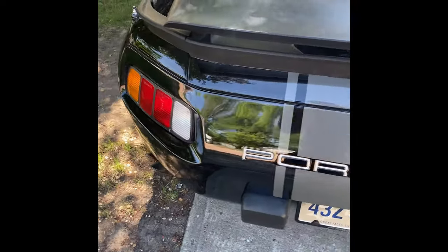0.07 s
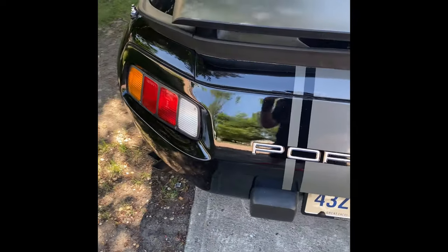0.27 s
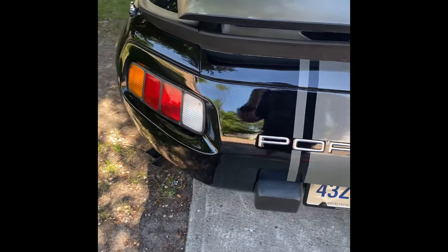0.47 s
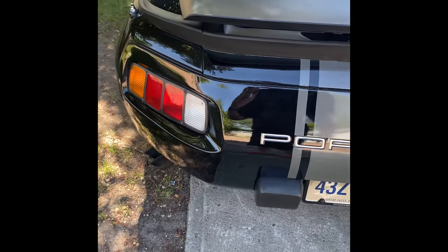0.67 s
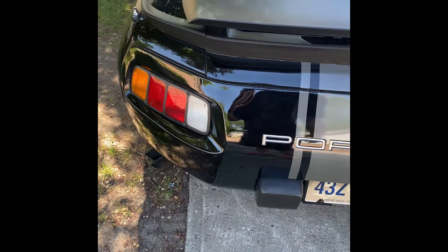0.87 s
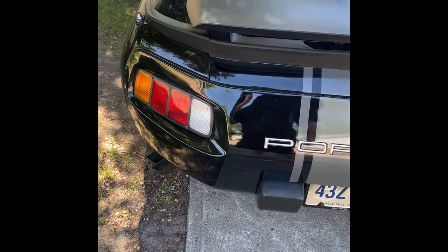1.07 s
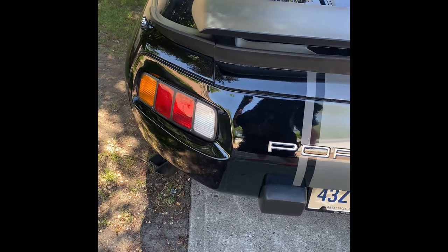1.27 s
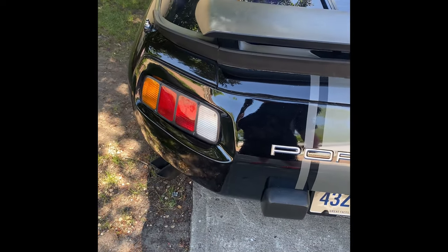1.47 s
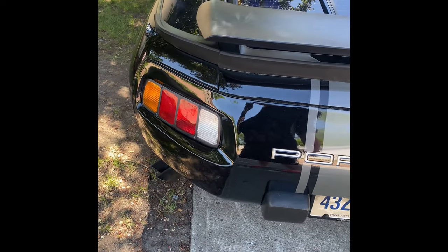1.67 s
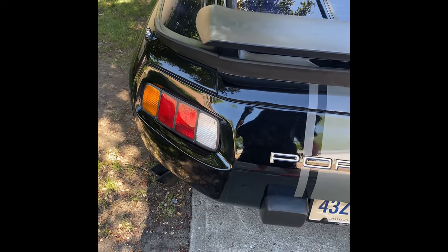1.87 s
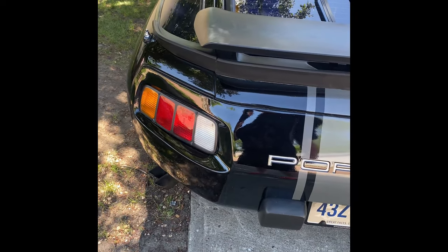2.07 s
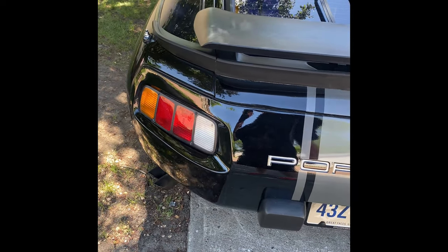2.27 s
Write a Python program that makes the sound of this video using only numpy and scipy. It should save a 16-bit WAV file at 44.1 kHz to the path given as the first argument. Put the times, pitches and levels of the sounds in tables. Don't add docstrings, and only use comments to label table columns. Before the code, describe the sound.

A large petrol engine idles steadily with a deep, even exhaust boom, heard close behind the tailpipe.

```python
import sys
import numpy as np
from scipy import signal
from scipy.fft import rfft, irfft
from scipy.io import wavfile
from scipy.ndimage import uniform_filter1d

SR = 44100
rng = np.random.default_rng(int(sys.argv[2]) if len(sys.argv) > 2 else 0)


def amplitude_ratio(level_db):
    exponent = np.asarray(level_db, float) / 20
    return 10 ** exponent


def output_pcm(signal):
    pcm = np.clip(np.atleast_2d(signal).T, -1, 1) * 32767
    wavfile.write(sys.argv[1], SR, np.round(pcm).astype(np.int16))


N = 102664
FIRINGS_PER_CYCLE = 8
TIP_LAG_CYCLES = .8


def level(x, db):
    return x * amplitude_ratio(db) / np.sqrt(np.mean(x ** 2))


def ring(x, hz, width_hz):
    pole = np.exp((2j * np.pi * hz - np.pi * width_hz) / SR)
    return level(signal.lfilter([1], np.poly([pole, pole]), x).imag, 0)


def walk(rate_hz):
    draw = np.interp(np.arange(N) * rate_hz / SR, np.arange(200), rng.standard_normal(200))
    return level(uniform_filter1d(draw, int(SR / rate_hz / 2)), 0)


def along(table, column):
    hz = np.fft.rfftfreq(N, 1 / SR) + 1
    return np.interp(np.log(hz), np.log(np.array(table)[:, 0]), np.array(table)[:, column])


def boom(cycle, orders, lag_cycles):
    wobble_db, wobble_rad, wobble_hz = .7, .007, 9
    out = 0
    for order, db in orders:
        gain = amplitude_ratio(db + wobble_db * walk(wobble_hz))
        phase = 2 * np.pi * (cycle - lag_cycles) + wobble_rad * walk(wobble_hz)
        out = out - gain * np.cos(order * phase)
    return out


def tip(cycle):
    tip_hz, swell_s, scatter_db, slip_rad = 395.5, .14, 1.5, .8
    # time [s], rms level [dB].
    drive = [(0, -30.5), (0.249, -36), (0.601, -40.5), (0.951, -31), (1.298, -37), (1.6, -29), (1.9, -33),
             (2.33, -31)]
    peak = np.flatnonzero(np.diff(np.floor(cycle - TIP_LAG_CYCLES)))
    strength, slip = rng.standard_normal((len(peak), 2)).T
    kick = np.zeros(N, complex)
    kick[peak] = amplitude_ratio(scatter_db * strength) * np.exp(1j * slip_rad * slip)
    half = int(swell_s * SR / 2)
    t = np.arange(-half, half + 1) / SR
    swell = np.hanning(2 * half + 1) * np.exp(2j * np.pi * tip_hz * t)
    tone = signal.fftconvolve(kick, swell, mode="same").real
    drive_db = np.interp(np.arange(N) / SR, *np.array(drive).T)
    return amplitude_ratio(drive_db) * level(tone, 0)


def uneven(cycle):
    # centre [Hz], width [Hz], rms level [dB].
    cavities = [(48, 13, -39), (82, 12, -36), (98, 14, -40), (114, 10, -39), (134, 9, -48), (152, 12, -50),
                (170, 18, -55), (195, 18, -51), (226, 15, -45), (250, 18, -47), (270, 15, -42),
                (292, 22, -47), (322, 20, -49), (348, 24, -52)]
    fired = np.flatnonzero(np.diff(np.floor(cycle * FIRINGS_PER_CYCLE)))
    out = 0
    for hz, width_hz, db in cavities:
        kick = np.zeros(N)
        kick[fired] = rng.standard_normal(len(fired))
        out = out + amplitude_ratio(db) * ring(kick, hz, width_hz)
    return out


def gas(cycle):
    firing_db, cycle_db, scatter_db = -1, 1, 4
    # centre [Hz], width [Hz], rms level [dB].
    whistles = [(409.2, 29, -41), (455, 46, -59), (529.2, 17, -52), (648, 57, -60), (698, 71, -48),
                (794, 100, -60.5), (1072, 220, -67.5), (1417, 65, -56), (1897, 120, -59.5)]
    firing = cycle * FIRINGS_PER_CYCLE
    puff_db = firing_db * np.cos(2 * np.pi * firing)
    puff_db = puff_db + cycle_db * np.cos(2 * np.pi * (cycle - TIP_LAG_CYCLES))
    puff_db = puff_db + scatter_db * np.interp(firing, np.arange(200), rng.standard_normal(200))
    out = 0
    for hz, width_hz, db in whistles:
        out = out + amplitude_ratio(db) * ring(amplitude_ratio(puff_db) * rng.standard_normal(N), hz, width_hz)
    return out


def hiss():
    hiss_db, patch_db, flicker_db = -39.5, .5, 1.5
    # frequency [Hz], density [dB per Hz].
    side_hiss = [(300, -8), (700, 0), (1900, -15), (2600, -10), (5600, -20), (7600, -15), (13150, -16),
                 (13250, -27)]
    # frequency [Hz], level [dB].
    mid_over_side = [(700, -6.5), (2000, -1.5), (3800, -7.5), (6500, -2), (7800, -3), (12000, -7.5),
                     (13100, -3), (14000, 2.5)]
    third = 3 * np.log2(np.fft.rfftfreq(N, 1 / SR) + 1)
    pair = rfft(rng.standard_normal((2, N))) * amplitude_ratio(along(side_hiss, column=1))
    pair[0] *= amplitude_ratio(along(mid_over_side, column=1))
    mid, side = np.zeros((2, N))
    for centre in range(22, 43):
        band = irfft(pair * np.clip(1 - abs(third - centre), 0, 1), N)
        mid += amplitude_ratio(flicker_db * walk(24.96) + patch_db * walk(7.955)) * band[0]
        side += amplitude_ratio(flicker_db * walk(20)) * band[1]
    return level(np.array([mid + side, mid - side]), hiss_db)


def scuffs():
    cracks_per_s, spread_db = 5000, 1.2
    # start [s], length [s], rms level [dB], treble [dB per octave],
    # swell exponent, lead of the left [samples].
    slides = [
        (0.188, 0.059, -28.5, 7.5, .4, 3),
        (0.641, 0.16, -40, -18, 0.72, 1),
    ]
    # centre [Hz], width [Hz], level [dB].
    grit = [(2120, 920, -12.5), (2610, 1030, 3.5), (3150, 1260, -2.5), (4200, 530, -3.5), (6550, 1200, -2),
            (8400, 1800, -9.5)]
    out, t = np.zeros((2, N)), np.arange(N) / SR
    for start_s, length_s, db, treble_db, swell, lead in slides:
        u = np.clip((t - start_s) / length_s, 0, 1)
        envelope = np.sin(np.pi * u ** swell) ** 1.7
        struck = rng.random(N) < cracks_per_s / SR
        cracks = struck * amplitude_ratio(spread_db * rng.exponential(size=N)) * rng.standard_normal(N)
        for ear in range(2):
            rub = .6 * level(rng.standard_normal(N), 0) * cracks.std()
            tone = 0
            for hz, width_hz, grit_db in grit:
                gain = amplitude_ratio(grit_db + treble_db * np.log2(hz / 2700))
                tone = tone + gain * ring(cracks + rub, hz, width_hz)
            out[ear] += np.roll(level(tone, db) * envelope, lead * ear)
    return out


def scene():
    # time [s], speed [rpm].
    speed = [(0.0, 993.8), (0.33, 983.3), (0.67, 992.5), (1.0, 989.8), (1.33, 988.8), (1.66, 1000.6),
             (2.0, 992.2), (2.33, 999.8)]
    # multiple of the cycle rate, peak level [dB].
    silencer = [(6, -38), (8, -14), (10, -20), (12, -32), (14, -32), (16, -41)]
    # multiple of the cycle rate, peak level [dB].
    banks = [(7, -42), (9, -33), (11, -34), (13, -33)]
    # multiple of the cycle rate, peak level [dB].
    pipe = [(22, -48), (24, -44), (25, -44), (27, -33), (29, -41), (31, -42), (33, -30), (34, -49),
            (38, -41)]
    # frequency [Hz], lead of the left [rad], left over right [dB].
    ports = [(50, 0, .1), (110, -.1, .2), (270, -.33, .4), (400, -1.2, .5), (520, -2.1, -1),
             (700, -2.4, -5), (1300, -1.8, -7.5), (2400, -1., 0)]
    rpm = np.interp(np.arange(N) / SR, *np.array(speed).T)
    cycle = .0455 + np.cumsum(rpm) / 120 / SR
    exhaust = boom(cycle, silencer, lag_cycles=.066)
    exhaust = exhaust + boom(cycle, banks, lag_cycles=.722) + boom(cycle, pipe, lag_cycles=.93)
    exhaust = exhaust + tip(cycle) + uneven(cycle) + gas(cycle)

    ear = np.array([[.5], [-.5]])
    lead_rad = along(ports, column=1) * ear
    tilt = amplitude_ratio(along(ports, column=2) * ear)
    margin = SR // 4
    padded = N + SR // 2

    def spread(rows):
        grid = np.linspace(0, 1, padded // 2 + 1)
        return np.array([np.interp(grid, np.linspace(0, 1, len(row)), row) for row in rows])

    lead = spread(lead_rad)
    turn = spread(tilt) * np.exp(1j * lead) / np.cos(np.clip(lead, -.7, .7))
    wide = irfft(rfft(np.pad(exhaust, margin, mode="reflect")) * turn, padded)[:, margin:margin + N]
    return wide + irfft(rfft(hiss()) * tilt, N) + scuffs()


def roll_off(x):
    return signal.sosfilt(signal.butter(12, 16900, fs=SR, output="sos"), x)


def record(dry):
    top_hz, spare_loud = 15700, 3
    # from [Hz], to [Hz], share of time lost by the sum,
    # share lost by the difference.
    dropouts = [(2900, 4100, .3, 0), (4700, 5400, .3, 0), (7900, 8300, .6, 0), (8300, 11300, 1, 0),
                (11300, 12300, .75, 0), (13250, 14600, .8, .4), (14600, 15800, .25, .55)]
    hz, t, z = signal.stft(np.array([dry[0] + dry[1], dry[0] - dry[1]]) / 2, SR, nperseg=2048)
    luck = uniform_filter1d(rng.standard_normal((2, 80, len(t))), size=3)
    luck = luck[:, (hz / 345).astype(int)]
    loud = np.log(uniform_filter1d(abs(z) ** 2, size=32, axis=1) + 1e-18)
    excess = loud - np.median(loud, axis=2, keepdims=True) - 1
    luck = luck + spare_loud * np.clip(excess, 0, 9)
    rank = np.argsort(np.argsort(luck)) / len(t)
    lost = 0
    for low_hz, high_hz, *share in dropouts:
        inside = ((hz >= low_hz) & (hz < high_hz))[:, None]
        lost = lost + inside * (rank < np.array(share)[:, None, None])
    mid, side = signal.istft(z * (1 - lost), SR, nperseg=2048)[1][:, :N]
    top = signal.ellip(10, .2, 70, top_hz, fs=SR, output="sos")
    mix = signal.sosfilt(top, np.array([mid + side, mid - side]))
    return roll_off(mix)


dry = scene()
out = record(dry)
output_pcm(out)
```